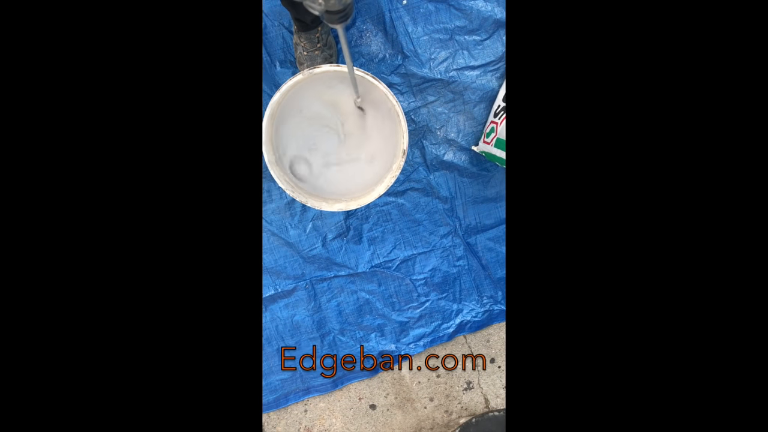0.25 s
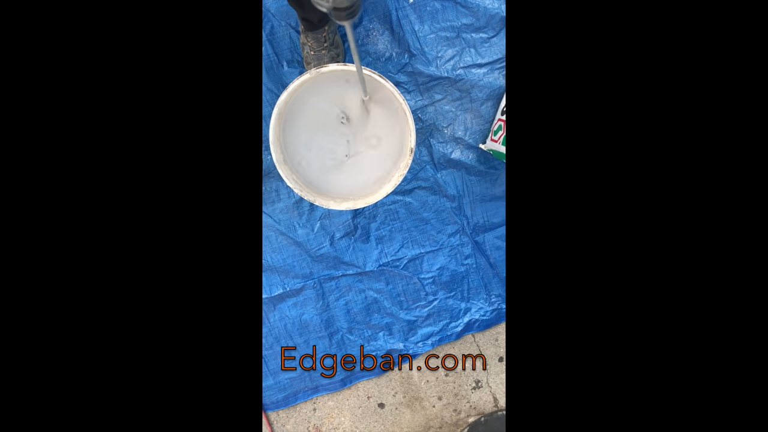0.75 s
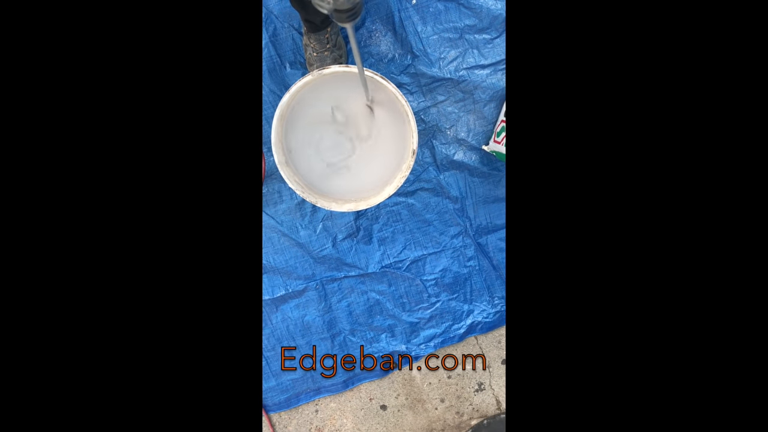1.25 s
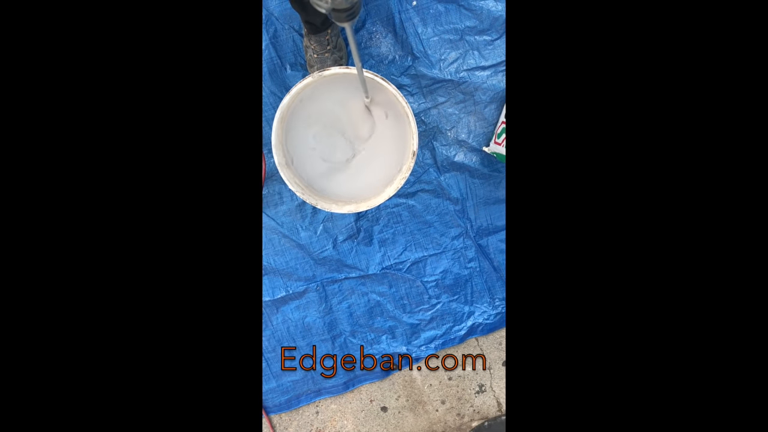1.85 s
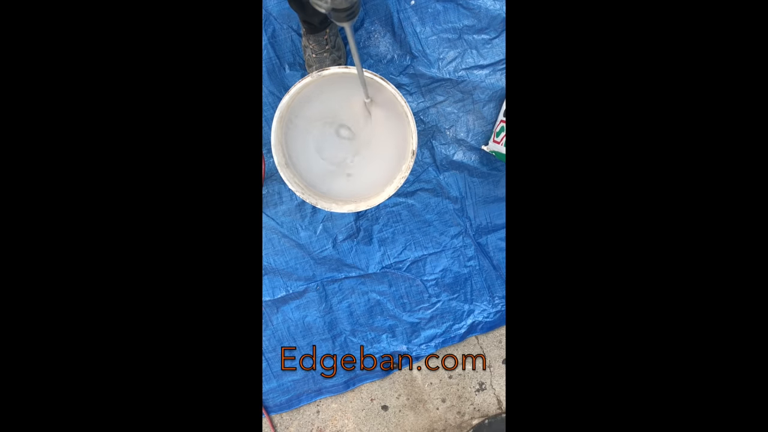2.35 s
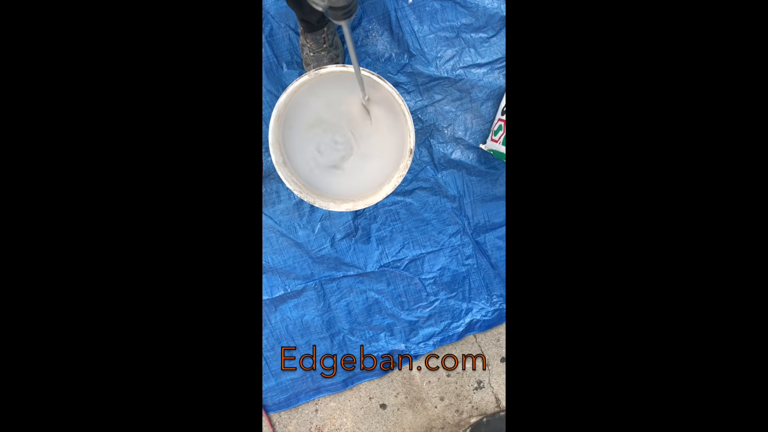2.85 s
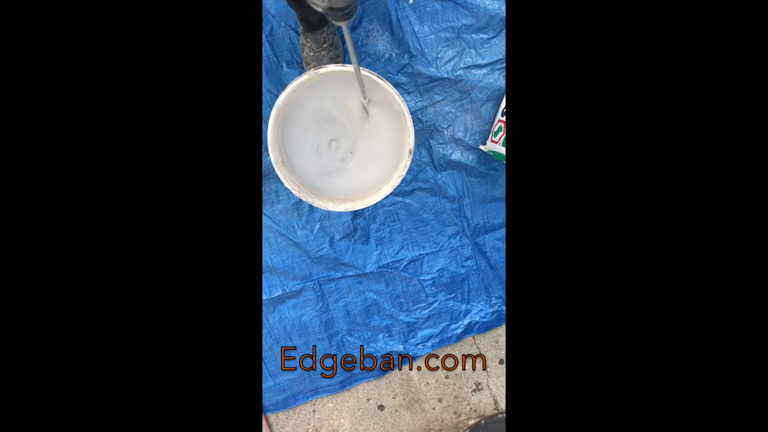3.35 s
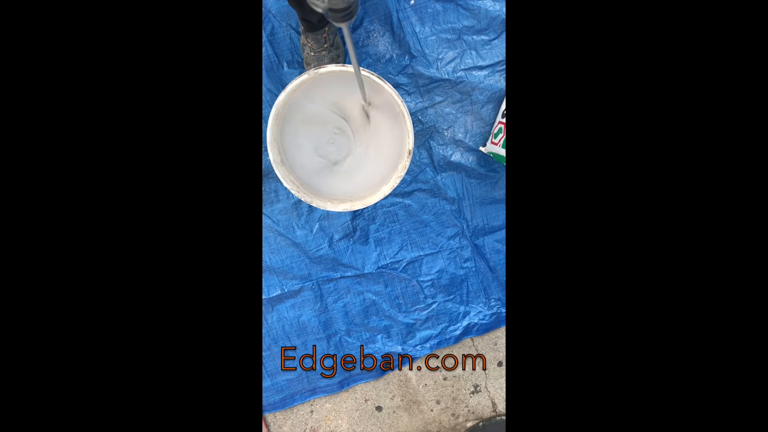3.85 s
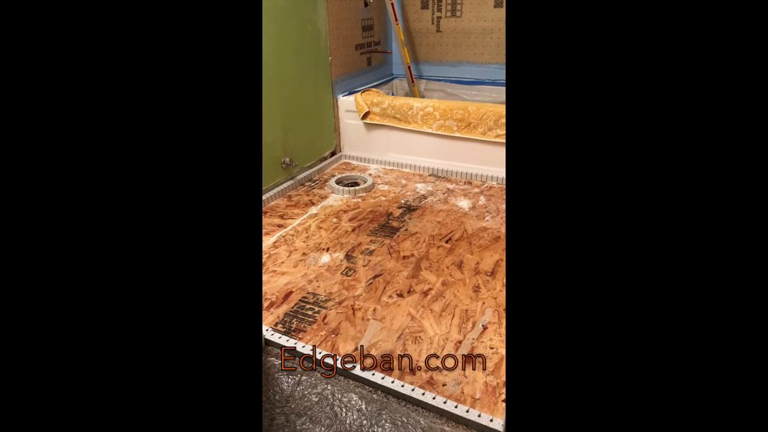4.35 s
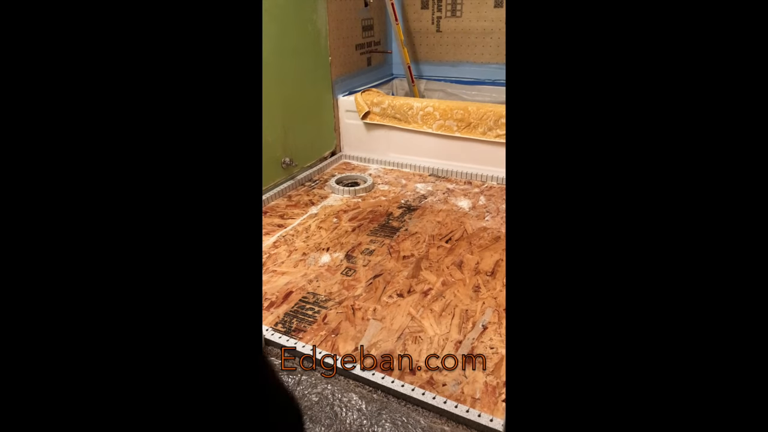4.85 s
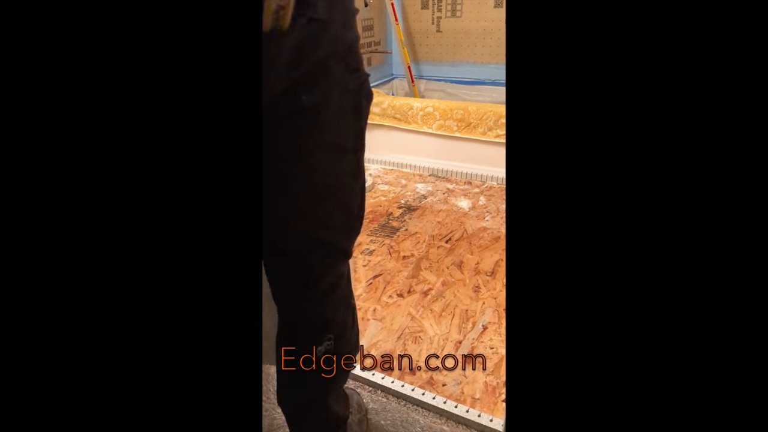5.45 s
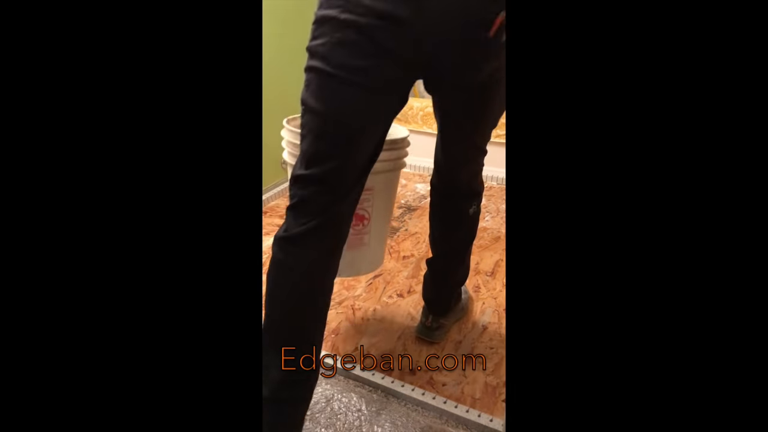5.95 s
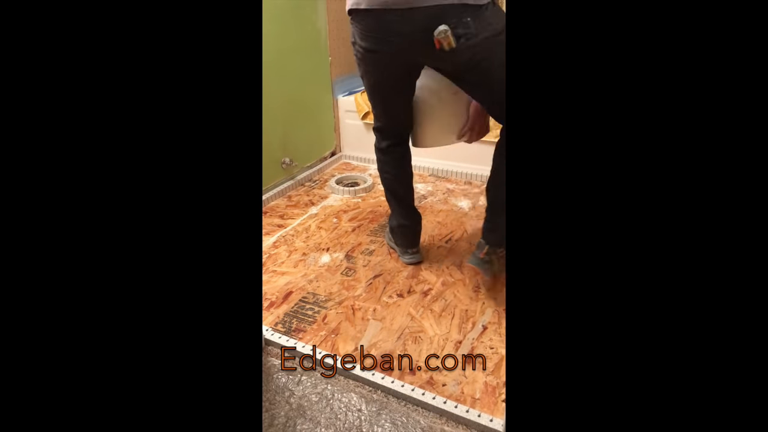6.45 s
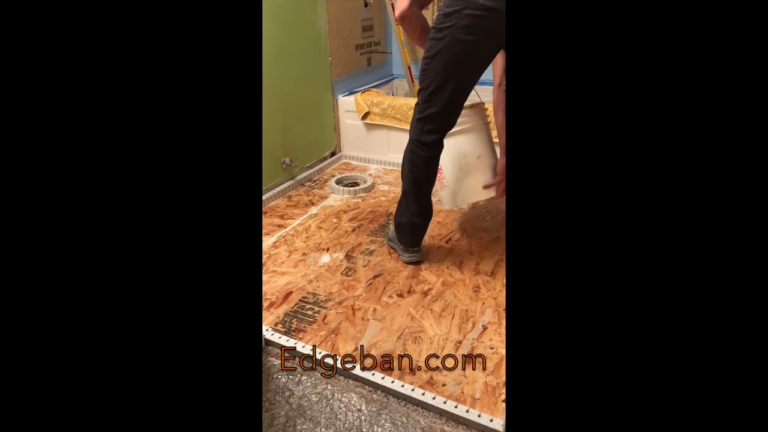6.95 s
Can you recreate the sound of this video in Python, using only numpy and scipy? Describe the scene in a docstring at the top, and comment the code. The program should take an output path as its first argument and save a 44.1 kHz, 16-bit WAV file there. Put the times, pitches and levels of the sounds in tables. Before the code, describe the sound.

An electric drill whines and rattles mixing mortar, then abruptly gives way to a quiet room with chirps, bucket handle clacks and footsteps.

```python
"""At a mortar bucket, an electric drill spins a paddle flat out: the motor whines, gears rattle,
cooling air hisses and the thin mortar churns. An abrupt cut leads to a quiet room with a humming fan.
Someone carries the bucket in over a wooden floor: its wire handle clacks on the plastic, shoes scuff
and thud, clothes swish. High chirps, likely a small bird, and a few faint squeaks echo off the walls."""
import sys
import numpy as np
from scipy import signal
from scipy.fft import rfft, irfft
from scipy.io import wavfile

SR = 44100
rng = np.random.default_rng(int(sys.argv[2]) if len(sys.argv) > 2 else 0)


def wav_out(sig):
    """Save sig, one row per channel (or a flat mono array), as 16-bit PCM at SR to the path in sys.argv[1]."""
    wavfile.write(sys.argv[1], SR, np.round(np.clip(np.atleast_2d(sig).T, -1, 1) * 32767).astype(np.int16))


N = 317958
T = np.arange(N) / SR
CUT_S = 4.33


def gain_of(db):
    """Decibels to amplitude."""
    return 10 ** (np.asarray(db) / 20)


def unit_rms(x):
    """Scales to rms 1."""
    return x / np.sqrt(np.mean(x ** 2) + 1e-20)


def curve_at(points, hz):
    """Interpolates on a log-frequency axis."""
    f, value = np.transpose(points)
    return np.interp(np.log(hz + 1), np.log(f), value)


def add(mix, start_s, sound):
    """Mixes a sound in at start_s."""
    part = mix[max(round(start_s * SR), 0):][:len(sound)]
    part += sound[:len(part)]


def coloured(x, spectrum):
    """Filters x by a spectrum; output rms 1."""
    hz = np.fft.rfftfreq(len(x), 1 / SR)
    return unit_rms(irfft(rfft(x) * gain_of(curve_at(spectrum, hz)), len(x)))


def wander(hz, size=N):
    """Smooth random drift up to about hz; rms 1."""
    lowpass = np.exp(-(np.fft.rfftfreq(size, 1 / SR) / hz) ** 2)
    return unit_rms(irfft(rfft(rng.standard_normal(size)) * lowpass, size))


def resonances(x, table):
    """Steep parallel resonances, each at its own rms level."""
    f, spectrum = np.fft.rfftfreq(N, 1 / SR), rfft(x)
    return sum(gain_of(db) * unit_rms(irfft(spectrum / (1 + 1j * (f - hz) / width) ** 2, N))
               for hz, width, db in table)


def swells(table):
    """Envelope of summed Gaussian swells."""
    return sum(gain_of(db) * np.exp(-((T - s) / half_s) ** 2 / 2) for s, half_s, db in table)


def motor_speed(free_hz=389.5, loaded_hz=384.72, grip_s=0.15, sag_s=0.24, sway_hz=0.3476, jostle_hz=0.16):
    """Shaft speed sags as the mortar grips, sways with the drag and is jostled by lumps."""
    unloaded = np.exp(-np.maximum(T - grip_s, 0) / sag_s)
    return loaded_hz + (free_hz - loaded_hz) * unloaded + sway_hz * wander(1.254) + jostle_hz * wander(25)


# shaft tones; 12 and 24 are commutator bars, 39 the top whine: (order [x shaft speed], rms level [dB])
SHAFT_TONES = [(1, -51.5), (2, -45), (3, -48.5), (4, -43.5), (5, -35.5), (6, -38.5), (9, -47.5), (12, -41),
               (14, -45), (18, -48), (20, -55), (21, -54), (22, -42), (23, -46.5), (24, -39), (25, -42),
               (26, -49), (28, -55), (33, -53), (38, -48), (39, -31.5)]
# gear mesh tones: (order [x shaft speed], rms level [dB])
MESH_TONES = [(5.6, -58), (7.75, -53), (38.7, -50), (39.3, -50)]
# scatter by rotor shake: (order [x shaft speed], depth [ratio])
ROTOR_SCATTER = [(1, 0.091), (2, 0.25), (5, 0.39), (24, .3), (39, .15)]


def motor_whine(turns, sway=0.14):
    """Tones sway as the drill moves in the hands and scatter as the rotor shakes in its bearings."""
    out = np.zeros(N)
    for order, db in SHAFT_TONES + MESH_TONES:
        carrier = np.exp(2j * np.pi * (order * turns + rng.random()))
        scatter = np.interp(order, *np.transpose(ROTOR_SCATTER))
        strength = 1 + sway * wander(5.2) + scatter * (wander(37) + 1j * wander(37))
        out += gain_of(db) * unit_rms((strength * carrier).real)
    return out


# gear and bearing rattle: (frequency [Hz], relative level [dB])
RATTLE_SPECTRUM = [(150, -42), (300, -13), (480, -11), (620, -4.5), (800, -5.5), (1050, -3.5), (1230, -3.5),
                   (1600, 2.5), (2100, -0.5), (2520, -1.5), (2950, 1), (3900, -3.5), (6000, -17),
                   (12000, -9.5)]
# gear case ringing: (frequency [Hz], width [Hz], rms level [dB])
CASE_MODES = [(2155, 180, -40.5), (2310, 310, -45), (2946, 400, -43), (3640, 8.3, -49), (916, 182, -45),
              (4490, 190, -41.5)]


def gears(turns, knock=0.044, beat=0.043, gear_ratio=0.4, rattle_db=-25.5):
    """Teeth rattle, pulsing with each turn of the motor and of the slower gear, and ring the case."""
    load = 1 + knock * np.cos(2 * np.pi * turns) + beat * np.cos(2 * np.pi * gear_ratio * turns)
    impacts = rng.standard_normal(N) * load * gain_of(0.93 * wander(310) + 0.33 * wander(4))
    return gain_of(rattle_db) * coloured(impacts, RATTLE_SPECTRUM) + resonances(impacts, CASE_MODES)


# cooling air and brush fizz: (frequency [Hz], relative level [dB])
FIZZ_SPECTRUM = [(1000, -25.5), (4200, -4), (5200, -3), (7000, -2), (7600, -5.5), (8500, 1.5), (9400, -0.5),
                 (10000, -7), (10500, -10.5), (11200, -1.5), (12400, -3.5), (13600, -1), (15000, -0.5),
                 (15900, -6)]


def air_and_brushes(turns, pulse_depth=0.03, fizz_db=-23.5, sparks_per_s=120, spark_size=2.0):
    """Cooling air hisses, pulsing faintly with the shaft; the brushes add tiny sparks."""
    pulse = 1 + pulse_depth * np.cos(2 * np.pi * turns)
    air = rng.standard_normal(N) * pulse * gain_of(0.54 * wander(900) + 0.25 * wander(25))
    sparks = spark_size * rng.standard_normal(N) * (rng.random(N) < sparks_per_s / SR)
    return gain_of(fizz_db) * coloured(air + sparks, FIZZ_SPECTRUM)


# churning mortar: (frequency [Hz], relative level [dB])
CHURN_SPECTRUM = [(20, -28), (35, -45), (50, -6), (75, 1), (110, -5), (150, -8), (220, -1), (400, -1.5),
                  (1000, -22), (4000, -60)]


def paddle(churn_db=-52, lumps_db=2.0):
    """The paddle churns the mortar; lumps make the level waver."""
    return gain_of(churn_db + lumps_db * wander(7.1)) * coloured(rng.standard_normal(N), CHURN_SPECTRUM)


def drill():
    """One shaft drives whine, gears and cooling air over the paddle's churn."""
    turns = np.cumsum(motor_speed()) / SR
    return motor_whine(turns) + gears(turns) + air_and_brushes(turns) + paddle()


# fan rumble: (frequency [Hz], relative level [dB])
FAN_SPECTRUM = [(20, -40), (45, -22), (85, 3), (140, 8), (280, 1.5), (400, 1.5), (600, 1), (750, -3.5),
                (1100, -8), (4000, -23.5)]
# duct resonances: (frequency [Hz], width [Hz], rms level [dB])
DUCT_MODES = [(176, 11, -78), (234, 5.3, -69.5), (331.8, 16, -59.5), (463.4, 16, -62), (629, 10, -64)]
# moving air: (frequency [Hz], relative level [dB])
WASH_SPECTRUM = [(300, -40), (800, -12), (1200, 1), (1800, 5), (2600, 1), (3800, -9.5), (8000, -30.5)]


def room_fan(since_cut_s, rumble_db=-55, wash_db=-62, rise_db_per_s=1.17):
    """A fan hums in its duct under a slowly growing wash of air."""
    rumble, duct, wash = rng.standard_normal((3, N))
    hum = gain_of(rumble_db) * coloured(rumble, FAN_SPECTRUM) + resonances(duct, DUCT_MODES)
    return hum + gain_of(wash_db + rise_db_per_s * since_cut_s) * coloured(wash, WASH_SPECTRUM)


# room and cloth hiss: (frequency [Hz], relative level [dB])
HISS_SPECTRUM = [(1000, -22), (4000, 7), (7000, 4), (9800, -1), (12000, -0.5), (15800, -10)]
# clothes swishing: (time [s], half length [s], level [dB])
CLOTH_SWISHES = [(4.78, 0.046, -60), (5.08, 0.2, -59.5), (5.62, 0.11, -49), (6.05, 0.19, -55),
                 (6.58, 0.17, -66.5)]


def hiss_and_clothes(since_cut_s, floor_db=-77, tail_db=-47, fall_db_per_s=80):
    """A hiss dies away to the room's noise floor; clothes swish with each stride."""
    level = gain_of(floor_db) + gain_of(tail_db - fall_db_per_s * since_cut_s) + swells(CLOTH_SWISHES)
    return level * coloured(rng.standard_normal(N), HISS_SPECTRUM)


# scuffs: (time [s], half length [s], level [dB])
SHOE_SCUFFS = [(4.356, 0.0081, -60), (5.175, .02, -52), (5.202, 0.0087, -42.5), (5.637, 0.011, -44.5),
               (6.636, 0.011, -63), (6.732, 0.01, -56)]
# scuff noise: (frequency [Hz], relative level [dB])
SCUFF_SPECTRUM = [(200, -11), (800, 2), (1300, 4.5), (2200, 1.5), (5000, -4.5), (9000, -4), (15000, -2)]


def scuffs():
    """Shoes and trousers rub in short bursts."""
    return swells(SHOE_SCUFFS) * coloured(rng.standard_normal(N), SCUFF_SPECTRUM)


# chirps: (time [s], length [s], middle pitch [Hz], glide [octaves], level [dB])
BIRD_CHIRPS = [(4.378, .032, 4600, -0.069, -34), (4.443, 0.034, 4700, -0.19, -35),
               (4.518, 0.032, 4540, -0.11, -34.5), (5.308, 0.029, 4050, -0.33, -40.5),
               (5.365, 0.042, 4400, 0.2, -47), (5.411, 0.038, 2910, -0.21, -36),
               (5.497, 0.034, 4490, -0.16, -41), (5.527, 0.044, 2875, -0.18, -35.5),
               (5.558, 0.04, 3300, 0.31, -41), (5.659, .04, 3195, -0.12, -38.5),
               (5.754, 0.016, 5370, 0.13, -38.5), (5.795, 0.041, 3066, .3, -36.5),
               (5.881, .048, 3060, 0.154, -38.5), (6.021, 0.033, 2870, -.1, -45),
               (6.085, 0.025, 4650, 0.18, -40), (6.154, 0.048, 4100, -.18, -48),
               (6.216, 0.027, 2933, -0.12, -35), (6.282, .046, 3390, 0.19, -42.5)]
# beak filter: (frequency [Hz], gain [dB])
BEAK_RESPONSE = [(1800, -35), (2800, -6), (3600, 5.5), (4700, 0.5), (5900, 2.5), (7000, -4.5), (8200, -1.5),
                 (9300, -16.5), (10400, 1.5), (11300, -18), (14000, -17), (17000, -26)]


def bird(warble=0.047, flutter_hz=700, shimmer=0.61, husk_db=-9.5, scoop_octaves=0.199):
    """Gliding, husky notes filtered by the beak; low ones scoop, high ones are thinner and raspier."""
    out = np.zeros(N)
    for start_s, length_s, pitch_hz, glide_octaves, db in BIRD_CHIRPS:
        n = int(length_s * SR)
        octaves_up = np.log2(pitch_hz / 3200)
        overtones_db = 6.5 - 18.5 * octaves_up
        rasp = 0.57 + 0.4 * octaves_up
        along = np.linspace(-1, 1, n)
        bend_octaves = glide_octaves * along / 2 + scoop_octaves * (pitch_hz < 3700) * along ** 2
        hz = pitch_hz * 2 ** bend_octaves * (1 + warble * rasp * wander(flutter_hz, n))
        phase = 2 * np.pi * np.cumsum(hz) / SR
        tone = np.zeros(n)
        for k in range(1, 6):
            harmonic_db = curve_at(BEAK_RESPONSE, k * hz) + overtones_db * (k > 1)
            tone += gain_of(harmonic_db) * (k * hz < SR / 2) * np.sin(k * phase)
        husk = gain_of(husk_db + overtones_db) * rasp * coloured(rng.standard_normal(n), BEAK_RESPONSE)
        note = (unit_rms(tone) + husk) * (1 + shimmer * rasp * wander(flutter_hz, n))
        add(out, start_s, gain_of(db) * unit_rms(note) * signal.windows.tukey(n, 0.55))
    return out


# handle strikes: (time [s], body level [dB], body decay [s], spot ring [Hz], tick level [dB])
HANDLE_CLACKS = [(4.426, -35.5, 0.0054, 2130, -20.5), (4.734, -43, .014, 2820, -43),
                 (4.785, -46, .0086, 2800, -57), (4.806, -39, .013, 2800, -32),
                 (4.827, -37.5, 0.017, 2400, -52), (4.961, -29.5, .005, 1720, -51),
                 (5.622, -47, .007, 2300, -56), (5.702, -41, .0037, 3200, -50),
                 (6.641, -50, .008, 1500, -62)]
# plastic wall's dense, damped modes: (frequency [Hz], relative level [dB])
WALL_SPECTRUM = [(200, -22), (700, -2), (1300, -24), (1720, 1), (2050, -7), (2400, -3), (3000, -4.5),
                 (3800, -8), (6000, -13), (12000, -22)]
# bare wire: (frequency [Hz], relative level [dB])
WIRE_SPECTRUM = [(700, -29), (2500, -7), (7000, 10), (15000, 5)]


def bucket_clacks(tick_s=0.0018, ring_db=7.0, ring_spread=1.7):
    """The wire handle ticks against the plastic bucket, which answers with a dry, hollow clack."""
    out, t = np.zeros(N), np.arange(SR // 8) / SR
    for start_s, body_db, decay_s, ring_hz, tick_db in HANDLE_CLACKS:
        body, tick = rng.standard_normal((2, len(t)))
        spot = [(ring_hz / ring_spread, 0), (ring_hz, ring_db), (ring_hz * ring_spread, 0)]
        wall = coloured(coloured(body, WALL_SPECTRUM), spot)
        add(out, start_s, gain_of(body_db) * np.exp(-t / decay_s) * wall)
        add(out, start_s, gain_of(tick_db) * np.exp(-t / tick_s) * coloured(tick, WIRE_SPECTRUM))
    return out


# footfalls: (time [s], level [dB])
FOOTFALLS = [(5.626, -51), (5.662, -51), (5.903, -31), (5.921, -42), (6.41, -53), (6.454, -47),
             (6.493, -45), (6.639, -43)]
# floorboard modes: (frequency [Hz], relative level [dB], t60 [s])
BOARD_MODES = [(95, -4, 0.11), (151, 6, 0.078), (232, 3, .08), (303, -3, 0.18), (412, 6.5, 0.057),
               (552, -2, 0.06), (755, -9, 0.055)]
# boards' weak bass radiation: (frequency [Hz], gain [dB])
BOARD_RADIATION = [(30, -30), (60, -14), (110, 0)]


def footsteps(detune=0.062):
    """Shoes thud on the boards; each spot rings a little differently."""
    thuds, t = np.zeros(N), np.arange(SR // 4) / SR
    for start_s, step_db in FOOTFALLS:
        ring = np.zeros(len(t))
        for hz, db, t60_s in BOARD_MODES:
            envelope = gain_of(db - 60 * t / t60_s) * rng.choice([-1, 1])
            spot_hz = hz * (1 + detune * rng.standard_normal())
            ring += envelope * np.sin(2 * np.pi * spot_hz * t)
        add(thuds, start_s, gain_of(step_db) * ring / np.sqrt(len(BOARD_MODES)))
    return thuds.std() * coloured(thuds, BOARD_RADIATION)


# squeaks: (time [s], length [s], start pitch [Hz], end pitch [Hz], level [dB])
FAINT_SQUEAKS = [(6.935, 0.079, 830, 818, -64.5), (7.008, .055, 805, 775, -67),
                 (7.145, 0.071, 770, 800, -65)]
# their thin colour: (frequency [Hz], gain [dB])
SQUEAK_RESPONSE = [(3500, -25), (4900, 5), (5600, 0), (6500, -6), (7500, -22)]


def squeaks():
    """Faint glides of which only harmonics 5 to 9 carry."""
    out = np.zeros(N)
    for start_s, length_s, start_hz, end_hz, db in FAINT_SQUEAKS:
        hz = np.geomspace(start_hz, end_hz, int(length_s * SR))
        phase = 2 * np.pi * np.cumsum(hz) / SR
        note = sum(gain_of(curve_at(SQUEAK_RESPONSE, k * hz)) * np.sin(k * phase) for k in range(5, 10))
        add(out, start_s, gain_of(db) * unit_rms(note) * signal.windows.tukey(len(hz), 0.5))
    return out


# room decay: (frequency [Hz], t60 [s])
ROOM_DECAY = [(150, 0.24), (1000, 0.33), (4500, 0.22), (10000, 0.18), (16000, 0.17)]


def room_echo(x, wet_db):
    """Direct sound plus dense wall reflections, treble dying first; total power is kept."""
    n = SR // 2
    taps = rng.standard_normal(n) * (rng.random(n) < 0.1) * (np.arange(n) > 130)  # 3 ms pre-delay
    hz, t, spectra = signal.stft(taps, SR, nperseg=256)
    decay = gain_of(-60 * t / curve_at(ROOM_DECAY, hz)[:, None])
    tail = signal.istft(spectra * decay, SR, nperseg=256)[1]
    reflections = signal.fftconvolve(x, tail / np.linalg.norm(tail))[:N]
    wet = gain_of(wet_db)
    return (x + wet * reflections) / np.hypot(1, wet)


def scene():
    """The drill, then a cut to the quiet room; both channels alike."""
    since_cut_s = np.maximum(T - CUT_S, 0)
    room = room_echo(bird() + squeaks(), wet_db=3)
    room += room_fan(since_cut_s) + hiss_and_clothes(since_cut_s)
    room += room_echo(bucket_clacks(), wet_db=-5.5)
    room += room_echo(footsteps() + scuffs(), wet_db=-9)
    cut = np.minimum(since_cut_s * 1000, 1)  # 1 ms crossfade
    return np.tile((1 - cut) * drill() + cut * room, (2, 1))


def record(dry, low_hz=42, high_hz=15790):
    """The microphone drops the deepest bass; a steep low-pass limits the band."""
    highpass = signal.butter(3, low_hz, "high", fs=SR, output="sos")
    lowpass = signal.firwin(1535, high_hz, window=("kaiser", 9), fs=SR)
    return signal.oaconvolve(signal.sosfilt(highpass, dry), lowpass[None], "same")


dry = scene()
out = record(dry)
wav_out(out)
```